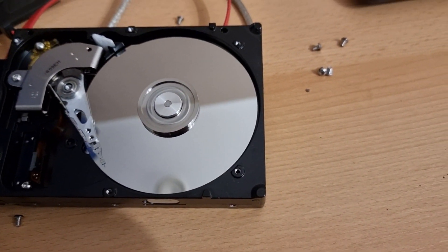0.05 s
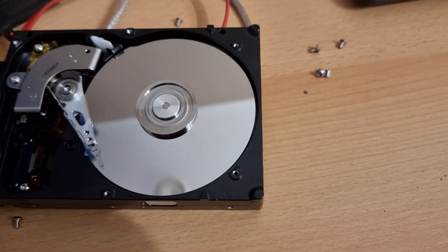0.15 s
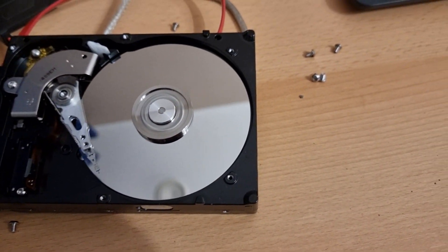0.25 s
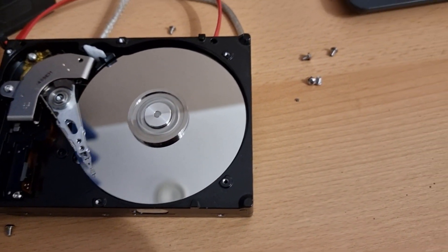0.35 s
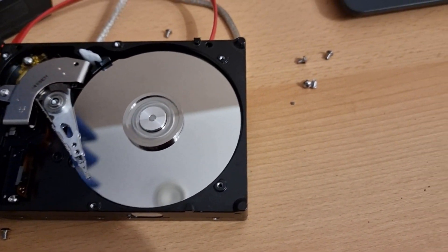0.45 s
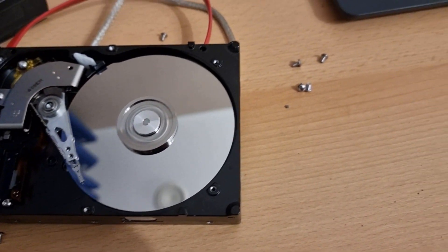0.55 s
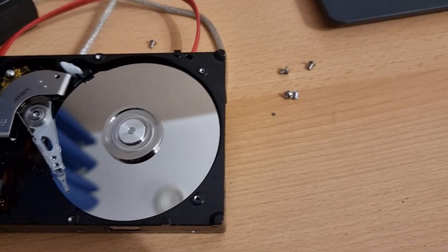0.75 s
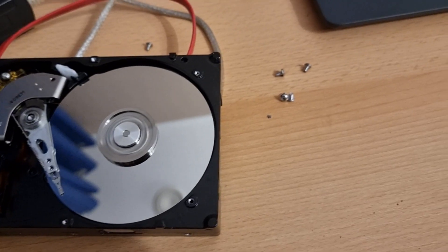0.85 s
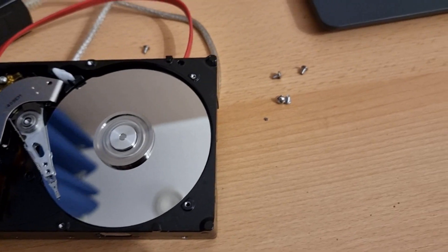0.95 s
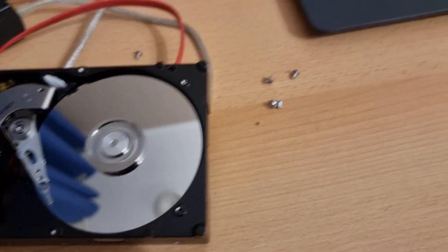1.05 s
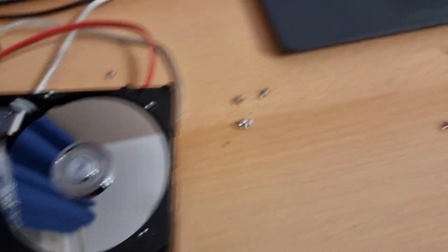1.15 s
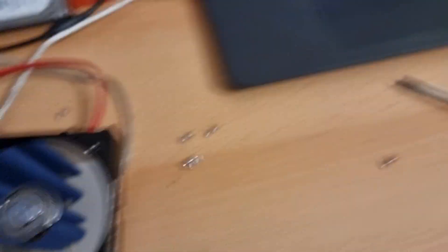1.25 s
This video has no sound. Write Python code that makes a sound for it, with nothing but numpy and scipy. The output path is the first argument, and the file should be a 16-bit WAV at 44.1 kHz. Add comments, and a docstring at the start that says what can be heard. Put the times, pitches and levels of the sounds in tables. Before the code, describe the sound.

An open hard drive's head arm snaps with a sharp, briefly ringing click, then at once drops back with a lighter, rattling click. Faint platter hiss and motor hum continue, heard close in a small room.

```python
"""Open hard drive on a wooden desk.

Close by, in a small room, the head arm snaps against a stop and rings, then drops back
with a lighter, rattling click. Each contact is a noise crack plus damped modes and a room tail.
Behind it: air hiss from the spinning platter, motor hum and a soft low rumble."""
import sys
import numpy as np
from scipy import signal
from scipy.fft import rfft, irfft
from scipy.io import wavfile
from scipy.ndimage import uniform_filter1d, minimum_filter1d

SR = 44100
rng = np.random.default_rng(int(sys.argv[2]) if len(sys.argv) > 2 else 0)


def put_to_file(sound):
    """Save the sound as 16-bit audio at rate SR, in the file named by the first command-line argument."""
    columns = np.atleast_2d(sound).T  # one column per channel
    safe = np.clip(columns, -1, 1)
    whole_steps = np.round(safe * 32767)
    wavfile.write(sys.argv[1], SR, whole_steps.astype(np.int16))


N = 57330
TIME_S = np.arange(N) / SR
BINS_HZ = np.maximum(np.fft.rfftfreq(N, 1 / SR), 1)

# Arm contacts: (time [s], crack [dB], metal [dB], clack [dB], arm tone [dB], crack tilt [dB/octave])
ARM_CONTACTS = [(0.2244, -13.5, -5, -1, -50, 4), (0.2265, -23, -1.5, -36, -4, -12),
                (0.2791, -25.5, -15, -4, -34, 5), (0.2812, -22, -14, -2.5, -25, -6.5),
                (0.289, -34, -46, -14, -26.5, -15), (0.2938, -30.5, -29, -24, -32.5, -19)]
# Arm tone: beating pair, faint long ring, desk knock: (frequency [Hz], level [dB], t60 [s], pan [dB])
ARM_MODES = [(1857.5, -5, 0.19, -10), (1864.7, -4, 0.13, -3.5), (1863, -30.5, 0.61, -12.5),
             (360, -32.5, 0.033, -21)]
# Ringing modes of arm, magnet plate and case: (frequency [Hz])
METAL_MODES_HZ = [1500, 2590, 3071, 3180, 3265, 3419, 3566, 3913, 4940, 4996, 5431, 6620, 7115]
# Same modes, same order: (level [dB], t60 [s], pan [dB])
METAL_RINGING = [(-30, 0.048, 10), (-27, 0.069, 15), (-28, 0.18, 19), (-10.5, 0.075, -1), (-19, 0.064, -5),
                 (-25, 0.077, 19), (-21.5, 0.056, -27.5), (-32.5, 0.31, -6), (-16.5, 0.052, 18),
                 (-21, .09, 9), (-19.5, 0.11, 12.5), (-29.5, 0.046, 15), (-21.5, 0.085, 2)]
# Heavily damped modes of the stop: (frequency [Hz], level [dB], t60 [s], pan [dB])
STOP_MODES = [(1522, -31, 0.075, 2), (3397, -6, 0.016, 8), (3890, -25.5, 0.037, -17),
              (4970, -14.5, 0.02, 12), (5246, -16, 0.019, -9), (7100, -27, 0.02, -6),
              (12440, -32, 0.013, -2), (14800, -27, .015, -3)]
# Contact crack: (frequency [Hz], relative density [dB])
CRACK_SPECTRUM = [(200, -23), (500, -19.5), (800, -38), (1150, -15.5), (1550, -1.5), (2300, -6.5),
                  (3350, 0), (4200, -16), (5100, -2), (7200, 0.5), (8100, -11), (10500, -16.5), (12500, -8),
                  (15500, -12.5)]
# Room tail: (frequency [Hz], relative density [dB])
ROOM_SPECTRUM = [(200, -18), (500, -4.5), (800, -32), (1800, 12), (2400, -9), (3300, 8), (4300, -0.5),
                 (7100, -8.5), (8500, -25), (15000, -15)]
# Broad hiss of air and room: (frequency [Hz], relative density [dB])
HISS_SPECTRUM = [(100, 0), (200, -7), (270, -13.5), (680, -6.5), (820, 1), (950, -0.5), (1400, 0.5),
                 (2100, -7), (4000, 1.5), (5800, -2), (7700, -8.5), (8600, -13), (11000, -18), (12200, -6),
                 (13400, -12.5), (14800, -6.5), (16000, -16)]
# Breakpoints of the resonance levels: (time [s])
RESONANCE_TIMES_S = [0, .27, .52, 1.15, 1.24]
# Platter air resonances and, at 1857 Hz, a faint arm ring swelling around the clicks:
# (frequency [Hz], width [Hz], pan [dB], level at each of five breakpoints [dB])
RESONANCES = [(1650, 268, -5, -42.5, -45.5, -43.5, -44, -47), (1857, 37, -10.5, -55, -38, -59, -55, -64),
              (2596, 250, 2.5, -48, -50, -49.5, -52.5, -45.5),
              (3296, 390, 5, -44.5, -45.5, -44, -45.5, -53.5), (4600, 720, 3.5, -49, -46, -55, -64, -42.5),
              (6390, 370, 3, -53.5, -48, -49, -50, -49.5), (7090, 546, -5, -44, -44, -45, -47, -47.5)]
# Motor and mains hum: (frequency [Hz], rms level [dB], pan [dB])
HUM_LINES = [(120.3, -44, 6), (200.5, -67, 2), (361, -68.5, 9.5), (494, -69.5, 4.5)]
# Rumble envelope: (time [s], level [dB])
RUMBLE_LEVELS = [(0.03, -39), (0.106, -48), (0.132, -60), (0.16, -46), (0.322, -73), (0.354, -46.5),
                 (0.454, -31.5), (0.492, -50), (0.514, -42), (0.712, -60.5), (0.97, -44), (0.998, -53),
                 (1.034, -48.5), (1.3, -67)]
# Rumble colour: (frequency [Hz], relative density [dB])
RUMBLE_SPECTRUM = [(20, -34), (35, -8), (56, 18), (70, 10), (95, -31), (200, -38), (500, -63)]
# Likeness of the two ears: (frequency [Hz], coherence [0..1])
EAR_COHERENCE = [(60, 0.89), (300, 0.63), (950, 0.65), (1700, 1), (2500, 0.52), (3300, 0.9), (5000, 0.32),
                 (6500, 0.22), (7300, 0.61), (8600, 1), (15000, 0.87)]
# Left ear's lead over the right: (frequency [Hz], phase [rad])
EAR_LEAD = [(60, -0.5), (120, 0.63), (300, 0.5), (900, -0.36), (1850, 1.0), (2350, 1.5), (2650, 4),
            (3200, 0.53), (3500, 1.23), (3900, 2.5), (5200, 3.5), (6500, 2), (7000, 0.54), (9000, 0)]


def arm_clicks():
    """Each contact cracks and rings the metal parts, the stop and the arm."""
    metal_modes = [(hz, *row) for hz, row in zip(METAL_MODES_HZ, METAL_RINGING)]
    radiation_hz = 1170  # small parts radiate little below this
    highpass = signal.butter(3, radiation_hz, "high", fs=SR, output="sos")
    out = np.zeros((2, N))
    for start_s, crack_db, metal_db, clack_db, tone_db, tilt_db_per_octave in ARM_CONTACTS:
        crack = from_db(crack_db) * contact_crack(start_s, tilt_db_per_octave)
        metal = from_db(metal_db) * ring(metal_modes, start_s, attack_s=0.0012)
        clack = from_db(clack_db) * ring(STOP_MODES, start_s, attack_s=0.00075)
        tone = from_db(tone_db) * ring(ARM_MODES, start_s, attack_s=0.0013)
        out += crack + signal.sosfilt(highpass, metal + clack) + tone
    return out


def contact_crack(start_s, tilt_db_per_octave):
    """Noise burst of one impact, tilted above 1 kHz, plus its short room tail."""
    octaves = np.log2(np.maximum(BINS_HZ, 1000) / 4000)
    crack = stereo_noise(from_db(over_bins(CRACK_SPECTRUM) + tilt_db_per_octave * octaves))
    crack *= strike_envelope(start_s, attack_s=0.00026, t60_s=0.025)
    tail = stereo_noise(from_db(over_bins(ROOM_SPECTRUM)))
    tail *= strike_envelope(start_s, attack_s=0.0047, t60_s=0.41)
    return crack + from_db(-11) * tail


def ring(modes, start_s, attack_s):
    """Damped sines set off by one contact."""
    out = np.zeros((2, N))
    for hz, level_db, t60_s, pan_db in modes:
        envelope = strike_envelope(start_s, attack_s, t60_s)
        out += from_db(level_db) * pan(pan_db) * envelope * stereo_sine(hz, start_s)
    return out


def platter_air_and_arm_ring():
    """Steady hiss, air resonances of varying level and a faint arm ring swelling around the clicks."""
    out = from_db(-41.5) * stereo_noise(from_db(over_bins(HISS_SPECTRUM)))
    for hz, width_hz, pan_db, *levels_db in RESONANCES:
        detuning = (BINS_HZ - hz ** 2 / BINS_HZ) / (1.65 * width_hz)
        resonance = stereo_noise(1 / (1 + detuning ** 2))
        level_db = np.interp(TIME_S, RESONANCE_TIMES_S, levels_db)
        out += from_db(level_db) * pan(pan_db) * resonance
    return out


def motor_hum():
    """Spindle tone at 120 rev/s, with faint lines above it."""
    return sum(np.sqrt(2) * from_db(rms_db) * pan(pan_db) * stereo_sine(hz, start_s=rng.random())
               for hz, rms_db, pan_db in HUM_LINES)


def rumble():
    """Low noise that swells and sinks."""
    level_db = np.interp(TIME_S, *np.transpose(RUMBLE_LEVELS))
    return from_db(level_db) * pan(1.5) * stereo_noise(from_db(over_bins(RUMBLE_SPECTRUM)))


def strike_envelope(start_s, attack_s, t60_s):
    """Quick rise, exponential fall."""
    age_s = np.maximum(TIME_S - start_s, 0)
    return (1 - np.exp(-age_s / attack_s)) * from_db(-60 * age_s / t60_s)


def stereo_noise(bin_gains):
    """Shaped noise, rms 1, with the coherence and phase lead between the ears."""
    mid, side = rfft(rng.standard_normal((2, N)))
    coherence = np.clip(over_bins(EAR_COHERENCE), -1, 1)
    mid *= np.sqrt(1 + coherence)
    side *= np.sqrt(1 - coherence)
    spectrum = bin_gains * np.array([mid + side, mid - side])
    spectrum[1] *= np.exp(-1j * over_bins(EAR_LEAD))
    noise = irfft(spectrum, N)
    return noise / np.sqrt(np.mean(noise ** 2))


def stereo_sine(hz, start_s):
    """Sine with zero phase at start_s on the left, phase-shifted on the right."""
    lead_rad = np.interp(hz, BINS_HZ, over_bins(EAR_LEAD))
    return np.sin(2 * np.pi * hz * (TIME_S - start_s) - np.array([[0], [lead_rad]]))


def over_bins(points):
    """Table interpolated onto the FFT bins over log frequency."""
    hz, values = np.transpose(points)
    return np.interp(np.log(BINS_HZ), np.log(hz), values)


def pan(db):
    """Channel gains for a left-minus-right level."""
    return from_db(np.array([[db], [-db]]) / 2)


def from_db(db):
    """Decibels to gain."""
    return 10 ** (np.asarray(db) / 20)


def scene():
    """Arm clicks over the running drive."""
    return arm_clicks() + platter_air_and_arm_ring() + motor_hum() + rumble()


def record(dry):
    """Fast peak limiter at full scale, then a steep low-pass."""
    limiter_s, cutoff_hz = 0.00097, 16400
    span = int(limiter_s * SR)
    allowed_gain = 1 / np.maximum(np.abs(dry), 1)
    gain = uniform_filter1d(minimum_filter1d(allowed_gain, span), span)
    lowpass = signal.cheby2(20, 70, cutoff_hz, fs=SR, output="sos")
    return signal.sosfilt(lowpass, gain * dry)


dry = scene()
out = record(dry)
put_to_file(out)
```